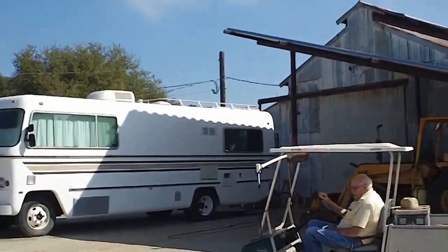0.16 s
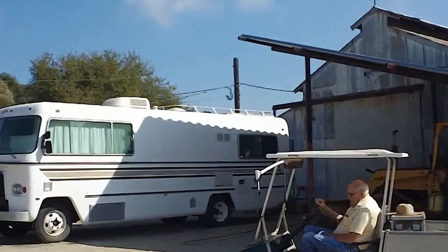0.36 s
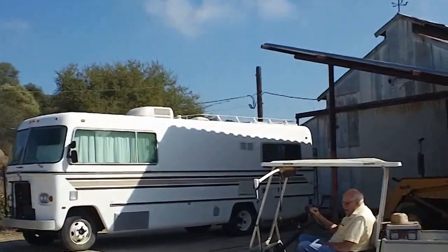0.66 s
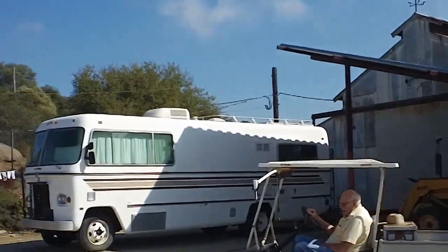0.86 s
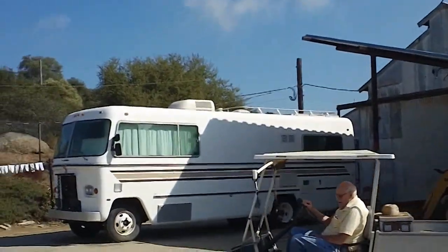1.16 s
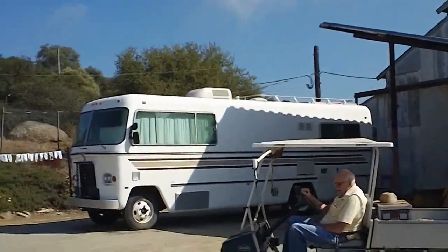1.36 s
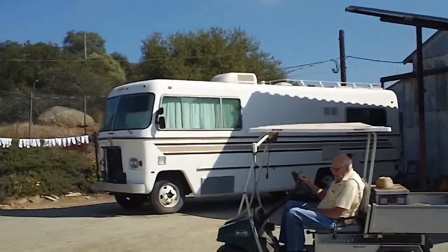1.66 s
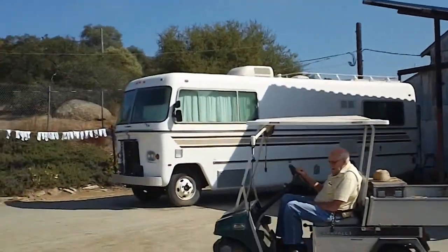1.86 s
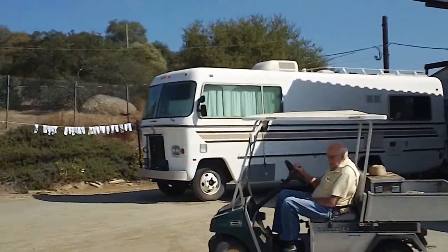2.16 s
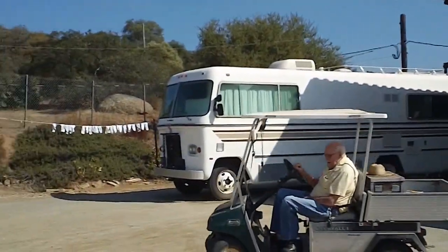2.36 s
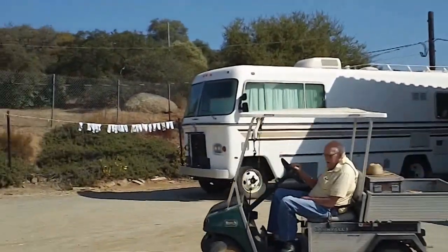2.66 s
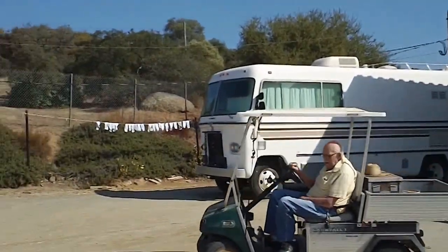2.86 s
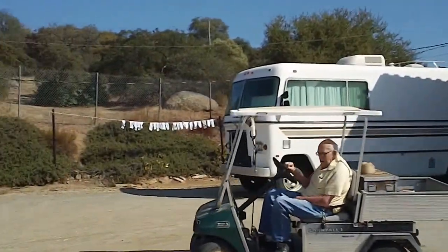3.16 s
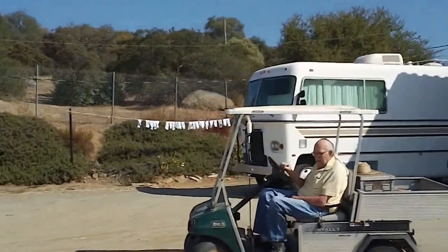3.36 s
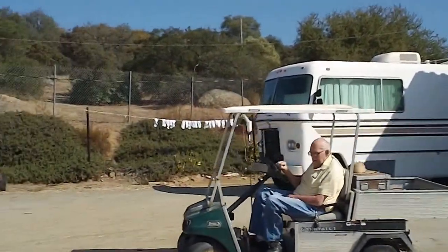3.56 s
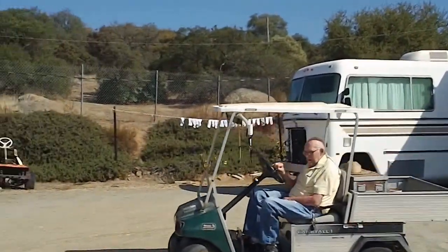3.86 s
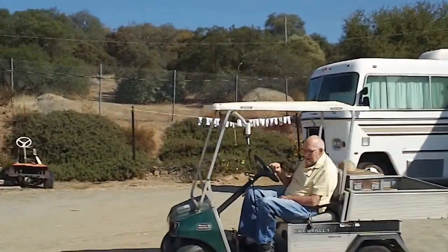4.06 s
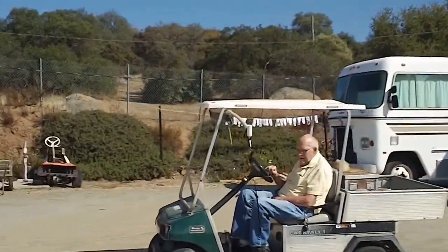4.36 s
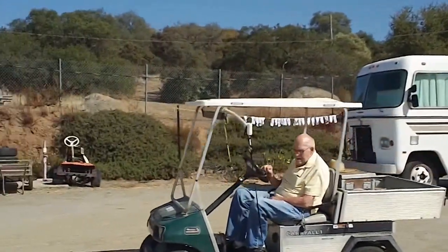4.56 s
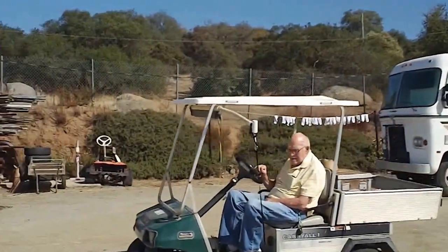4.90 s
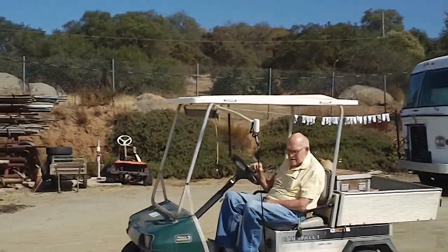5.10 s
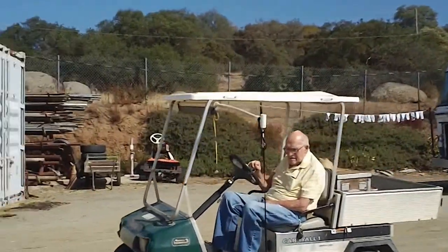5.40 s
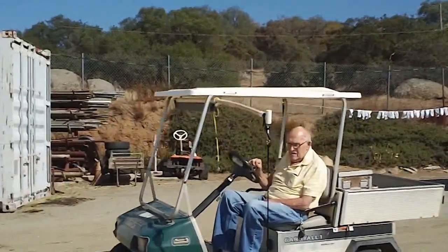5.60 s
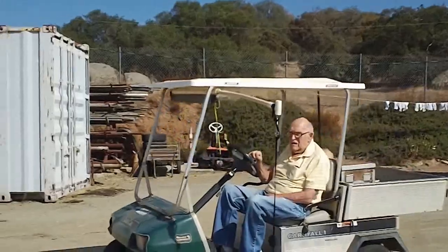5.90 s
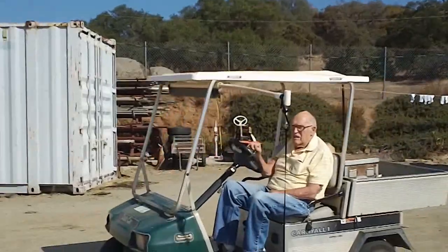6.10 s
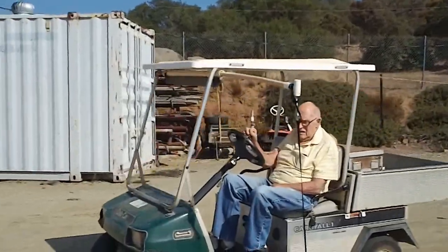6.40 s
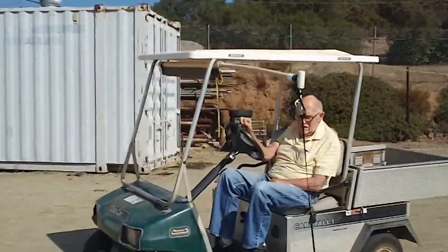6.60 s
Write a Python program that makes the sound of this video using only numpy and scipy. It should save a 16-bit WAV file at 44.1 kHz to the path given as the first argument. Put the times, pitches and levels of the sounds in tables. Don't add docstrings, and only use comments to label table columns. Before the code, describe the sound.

A handheld microphone in open air follows a small cart rolling on loose stones. Two bursts of wind rumble and crackle over it early on, then the rolling comes clear: mid-range drumming, low rumble, fine grit hiss, soft drive pulses and a brief whine. Knocks and stone clicks thicken before another blustery gust breaks in near the end.

```python
import sys
import numpy as np
from scipy import signal
from scipy.io import wavfile
from scipy.ndimage import uniform_filter1d

SR = 44100
rng = np.random.default_rng(int(sys.argv[2]) if len(sys.argv) > 2 else 0)


def dump(signal):
    limited = np.clip(np.atleast_2d(signal).T, -1, 1)
    pcm = np.round(limited * 32767).astype(np.int16)
    wavfile.write(sys.argv[1], SR, pcm)


def field_ratio(decibels):
    return 10 ** (np.asarray(decibels, dtype=float) / 20)


N = 297234


def clock():
    return np.arange(N) / SR


def rms_one(x):
    return x / np.sqrt(np.mean(x ** 2) + 1e-20)


def in_time(rows):
    s, *columns = np.transpose(rows)
    return [np.interp(clock(), s, column) for column in columns]


def drift(rate_hz):
    r = np.exp(-80 * np.pi * rate_hz / SR)
    slow = signal.lfilter([1], [1, -2 * r, r * r], rng.standard_normal(N // 40 + 2002))
    slow = rms_one(slow[2000:])
    return np.interp(np.arange(N) / 40, np.arange(len(slow)), slow)


def noise_band(order, hz, kind):
    return signal.sosfilt(signal.butter(order, hz, kind, fs=SR, output="sos"), rng.standard_normal(N))


def bell(x, hz, width_hz, db):
    w, gain = 2 * np.pi * hz / SR, field_ratio(db)
    pole = np.tan(np.pi * width_hz / SR) / max(gain, 1)
    top = [1 + pole * gain, -2 * np.cos(w), 1 - pole * gain]
    return signal.lfilter(top, [1 + pole, -2 * np.cos(w), 1 - pole], x)


def ring(clicks, hz, t60):
    r, w = field_ratio(-60 / (t60 * SR)), 2 * np.pi * hz / SR
    return signal.lfilter([0, np.sin(w)], [1, -2 * r * np.cos(w), r * r], clicks + 1e-18)


def textured(spectrum, shared_db, own_db, own_rate, grain_db):
    hz, level_db = np.transpose(spectrum)
    edges = np.geomspace(hz[0], hz[-1], int(4 * np.log2(hz[-1] / hz[0])) + 2)
    grain_size = field_ratio(grain_db * np.minimum(rng.exponential(1, (2, N)), 5))
    grains = rng.standard_normal((2, N)) * grain_size
    out = np.zeros(N)
    for k, (low, high) in enumerate(zip(edges, edges[1:])):
        sos = signal.butter(2, [low, high], "band", fs=SR, output="sos")
        band = signal.sosfilt(sos, grains[k % 2])
        centre_db = np.interp(np.log(low * high) / 2, np.log(hz), level_db)
        out += band * field_ratio(centre_db + own_db * drift(own_rate))
    return rms_one(out * field_ratio(shared_db))


# pitch in Hz, level in dB per Hz.
ROAR_SPECTRUM = [(330, -38.5), (560, -9), (635, 6.5), (700, 0), (808, 1), (948, -2.5), (1170, -3.5),
                 (1440, -11.5), (1700, -12.5), (2200, -30.5), (2860, -47), (4840, -120)]


def roar(swing_db, bumps):
    texture = textured(ROAR_SPECTRUM, 1.5 * bumps, own_db=1.4, own_rate=12, grain_db=3.5)
    return field_ratio(-33.5 + 0.87 * swing_db) * texture


# pitch in Hz, level in dB per Hz.
RUMBLE_SPECTRUM = [(24, -60), (40, -43), (91, -8.5), (184, -11), (259, -3), (294, -7.5), (424, -8.5),
                   (520, -14.5), (680, -45.5), (1140, -120)]


def rumble(swing_db, bumps):
    texture = textured(RUMBLE_SPECTRUM, 0.72 * bumps, own_db=1.5, own_rate=17.5, grain_db=2.0)
    return field_ratio(-37.5 + 0.74 * swing_db) * texture


# pitch in Hz, level in dB.
FITTING_PINGS = [(3300, -15), (4040, -1.5), (4860, -4), (5800, -2.5), (6900, -1), (8800, -1.5),
                 (9500, -2.5), (10600, -5)]


def rattles(per_s, t60):
    sizes = field_ratio(2.2 * np.minimum(rng.exponential(1, N), 4)) * (rng.random(N) < per_s / SR)
    dealt = rng.integers(0, len(FITTING_PINGS), N)
    out = np.zeros(N)
    for k, (hz, db) in enumerate(FITTING_PINGS):
        out += field_ratio(db) * ring(sizes * (dealt == k), hz, t60)
    return rms_one(out)


# pitch in Hz, level in dB per Hz.
HISS_SPECTRUM = [(1500, 10), (2300, 2), (2900, 2), (7000, 2), (8000, -11), (9000, -32)]


def hiss(fine_db, bumps):
    texture = textured(HISS_SPECTRUM, 1.6 * bumps, own_db=.7, own_rate=30, grain_db=4.5)
    texture += field_ratio(-11) * rattles(per_s=110, t60=.03)
    return field_ratio(-44 + 0.99 * fine_db) * texture


# pitch in Hz, level in dB per Hz.
GRIT_SPECTRUM = [(7000, -42), (8000, -1), (9000, 3.5), (10200, 1.5), (12000, -6.5), (15200, -8.5),
                 (17000, -31.5)]


def grit(fine_db, bumps):
    return field_ratio(-51 + fine_db) * textured(GRIT_SPECTRUM, 1.6 * bumps, own_db=.8, own_rate=30, grain_db=4.5)


# time in seconds, drive cycles done so far.
DRIVE_CYCLES = [(0, -26.36), (2.5, 5.64), (3.7, 21.82), (5.3, 45.57), (6.74, 67.61)]


def thumps(duck_db):
    cycles, = in_time(DRIVE_CYCLES)
    new_cycle = np.diff(np.floor(cycles + .2), prepend=0) > 0
    pulses = new_cycle * field_ratio(2 * drift(20))
    for hz in (78, 90, 104):
        pulses = ring(pulses, hz, t60=.045)
    return field_ratio(-43.5 + 0.31 * duck_db) * rms_one(pulses)


# time in seconds, peak in dB.
BODY_KNOCKS = [(3.642, -22), (3.939, -18), (3.968, -33), (3.997, -25), (4.039, -29), (4.533, -19),
               (4.716, -12), (4.801, -32), (4.835, -12), (4.855, -21), (5.036, -19), (5.067, -22),
               (5.202, -15), (5.234, -12), (5.333, -13), (5.442, -48), (5.503, -37), (6.72, -33)]
# pitch in Hz, level in dB, time to fade by 60 dB in seconds.
BODY_RINGS = [(690, 0, .035), (840, -1, .03), (1150, -5, .02), (1700, -16, .012)]


def knocks():
    at = [round(s * SR) for s, db in BODY_KNOCKS]
    peak_db = np.array(BODY_KNOCKS)[:, 1]
    luck_db = rng.normal(0, 6.3, (len(at), len(BODY_RINGS)))
    out = np.zeros(N)
    for k, (hz, level_db, t60) in enumerate(BODY_RINGS):
        clicks = np.zeros(N)
        clicks[at] = field_ratio(peak_db + level_db - 10.5 + luck_db[:, k])
        out += ring(clicks, hz, t60)
    rubber = signal.butter(2, 1500, fs=SR, output="sos")
    return signal.sosfilt(rubber, out)


# time in seconds, peak in dB, length in seconds.
SPAT_STONES = [(2.746, -24, 0.0041), (3.209, -27.5, 0.0033), (3.265, -34, 0.0019), (3.546, -34.5, 0.006),
               (4.12, -30, 0.006), (4.28, -17, 0.012), (4.891, -17, 0.0078), (5.14, -18, 0.0073),
               (5.476, -33, 0.0058), (5.535, -18, 0.0065), (5.63, -19, 0.006), (3.282, -22, .003),
               (3.607, -20, .003), (3.9845, -26, .004), (4.3951, -24, .003), (4.5417, -21, .003),
               (4.6555, -24, .003), (5.1918, -24, .003), (5.37, -19, .003), (5.4157, -20, .003),
               (5.4392, -24, .003), (5.8019, -19, .004), (5.8518, -24, .003), (5.903, -25, .003),
               (5.94, -23, .004), (6.07, -20, .004), (6.3945, -22, .005), (6.7188, -22, .004)]


def spits():
    t = clock()
    burst = np.zeros(N)
    for s, db, length in SPAT_STONES:
        after = t > s
        burst += field_ratio(db - 14.5) * np.exp(-(t - s) * after / length) * after
    return burst * noise_band(1, [2800, 11000], "band")


# time in seconds, level in dB.
NEARNESS = [(0, -1.5), (1, -1), (2, 0.7), (2.45, -0.5), (2.65, 0), (3, -2), (3.6, 1.1), (4.1, 2), (4.5, 3),
            (5, 3), (5.5, 3.5), (6.3, 1.5), (6.74, 2.5)]
# time in seconds, swell in dB, length in seconds.
RUT_SWELLS = [(2.757, 2.5, 0.2), (2.947, 2.5, 0.068), (3.18, 4.5, 0.085), (3.587, 2, 0.16),
              (4.063, 2.5, 0.12), (4.755, -2, 0.045), (4.86, 2, 0.063), (5.23, 2, 0.059),
              (5.52, 1.5, 0.059), (5.797, 1, 0.062), (6.09, 1.5, 0.027), (6.74, 1, 0.051)]


def cart(duck_db):
    t = clock()
    ruts_db = sum(db * np.exp(-((t - s) / length) ** 2) for s, db, length in RUT_SWELLS)
    swing_db = duck_db + in_time(NEARNESS)[0] + ruts_db
    fine_db = swing_db - (1 - 0.42) * ruts_db
    cycles, = in_time(DRIVE_CYCLES)
    fine_db = fine_db + .9 * np.cos(4 * np.pi * cycles - .3)
    bumps = 0.21 * drift(4.2) + 0.55 * drift(59)
    rolling = roar(swing_db, bumps) + rumble(swing_db, bumps) + thumps(duck_db)
    stones = hiss(fine_db, bumps) + grit(fine_db, bumps)
    return rolling + stones + knocks() + spits()


# time in seconds, level in dB, length in seconds.
STONE_CRUNCHES = [(3.98, -38, 0.038), (4.075, -39.5, 0.05), (5.237, -45, 0.034), (6.72, -39.5, 0.041),
                  (6.12, -44, .03), (5.98, -48.5, .25), (6.52, -48.5, 0.19)]


def crunches():
    t = clock()
    swell = sum(field_ratio(db) * np.exp(-((t - s) / length) ** 2) for s, db, length in STONE_CRUNCHES)
    return swell * rms_one(noise_band(2, [1400, 2600], "band"))


# time in seconds, pitch in Hz, level in dB.
GEAR_TONE = [
    (2.55, 822, -49),
    (2.972, 823.4, -39.5),
    (3.008, 838.5, -41.5),
    (3.438, 830.9, -39.5),
    (3.516, 870.0, -44),
    (3.55, 869.1, -35),
]


def whine():
    hz, level_db = in_time(GEAR_TONE)
    t = clock()
    fade = np.clip(np.minimum(t - GEAR_TONE[0][0], GEAR_TONE[-1][0] - t) / .1, 0, 1)
    phase = 2 * np.pi * np.cumsum(hz + 10 * drift(14)) / SR
    return fade * field_ratio(level_db - 3 + 4.0 * drift(18)) * np.sin(phase)


# pitch in Hz, width in Hz, lift in dB.
PANEL_RESONANCES = [(262.6, 4.7, 5.5), (350, 10, -1), (664, 14, 2), (692, 23, 4), (827, 15, 4),
                    (1115, 32, 6), (1730, 19, 2.5), (1841, 58, 6), (2270, 120, 4.5), (2720, 160, -2),
                    (389, 14, 2.5), (869, 14, 2.5)]
# pitch in Hz, width in Hz, lift in dB.
HOUSING_RESONANCES = [(3280, 260, 2), (3880, 440, 2.5), (4780, 410, 2.5), (5770, 150, 2), (10500, 630, -4)]
NULL_PITCHES = [540, 4350, 5250, 7830, 7910, 10950]
# width in Hz, depth in dB.
NULL_SHAPES = [(120, -15), (170, -6.5), (250, -2.5), (415, -35), (415, -29), (440, -27)]


def coloured(sound):
    sound = signal.sosfilt(signal.butter(2, 55, "high", fs=SR, output="sos"), sound)
    nulls = [(hz, *shape) for hz, shape in zip(NULL_PITCHES, NULL_SHAPES)]
    for hz, width_hz, db in PANEL_RESONANCES + HOUSING_RESONANCES + nulls:
        sound = bell(sound, hz, width_hz, db)
    return sound


# start in seconds, end in seconds, level in dB.
TURBULENCE = [(0, .55, -36), (0.596, 0.907, -67), (1.1, 1.304, -48), (1.458, 1.762, -37.5),
              (3.34, 3.515, -38), (5.33, 5.71, -45), (5.76, 5.9, -27), (6.14, 6.285, -34),
              (6.378, 6.74, -37.5)]
# pitch in Hz, level in dB per Hz.
WIND_SPECTRUM = [(20, 3), (55, 0.5), (110, 2), (170, 1), (260, -2), (400, -7.5), (600, -33), (1000, -37)]
# pitch in Hz, level in dB per Hz.
FLUTTER_SPECTRUM = [(250, 0.5), (420, 8), (600, 0.5), (900, -23), (1400, -27.5), (2200, -60)]
# time in seconds, peak in dB, centre pitch in Hz,
# flutter in dB.
EDDIES = [(.004, -8, 155, -38), (.03, -22, 150, -57), (.08, -12.5, 185, -46), (.1, -1.5, 224, -27),
          (.121, -8, 129, -47), (.15, -15, 158, -45), (.178, -7.5, 138, -44), (.201, -15, 190, -40),
          (.216, -3, 164, -18), (.251, -1.5, 141, -39), (.271, -9.5, 163, -41),
          (.285, -10.5, 274, -21), (.321, -20, 196, -34), (.352, -9, 219, -27), (.37, -8.5, 213, -28),
          (.4, -5.5, 283, -22), (.431, -13, 172, -46), (.453, -8, 260, -14.5), (.5, -16.5, 120, -36),
          (.553, -3, 364, -28), (.578, -2.5, 170, -18.5), (.622, -10.5, 168, -36),
          (.665, -16.5, 153, -32), (.71, -14.5, 220, -38.5), (.811, -10.5, 109, -34.5),
          (.838, -25, 119, -59),
          (1.105, -28, 139, -59), (1.141, -21, 132, -57), (1.163, -12, 85.5, -49),
                 (1.203, -16, 113, -51), (1.229, -8.5, 138, -33), (1.254, -2.5, 126, -25),
                 (1.269, -3, 216, -27), (1.288, -8, 213, -20.5), (1.332, -8, 120, -17.5),
                 (1.372, -9.5, 98.5, -30.5), (1.414, -20, 159, -46), (1.457, -23, 130, -58),
                 (1.487, -8, 126, -31), (1.537, -16, 124, -33.5), (1.565, -8, 186, -27.5),
                 (1.58, -9.5, 215, -38), (1.599, -22, 183, -36), (1.637, -2.5, 226, -41),
                 (1.649, -7.5, 242, -24), (1.661, -12, 212, -23), (1.675, -13, 254, -21),
                 (1.69, -22, 192, -32), (1.719, -21, 109, -58), (1.743, -28, 173, -43),
                 (3.366, -16.5, 138, -59), (3.451, -24, 190, -45), (3.641, -22, 206, -47),
          (5.632, -6.5, 133, -31), (5.663, -12.5, 184, -47), (5.743, -8, 195, -24),
                (5.769, -7, 136, -48), (5.787, -14, 209, -34), (5.797, -8, 163, -34),
                (5.853, -5.5, 220, -22), (5.872, -10, 240, -28), (5.959, -8, 183, -15.5),
                (5.974, -13, 200, -20), (5.984, -7.5, 176, -21), (6.005, -20, 199, -31),
                (6.11, -15, 168, -47), (6.139, -8.5, 120, -25.5), (6.163, 0.5, 190, -14),
                (6.186, 0.5, 234, -12.5), (6.212, -4, 284, -20), (6.251, -12.5, 138, -45),
                (6.272, -6, 243, -19.5), (6.288, -20, 260, -31), (6.367, -16, 131, -54),
                (6.417, -9.5, 253, -19.5), (6.426, -9, 117, -28.5), (6.491, -13.5, 155, -53),
                (6.508, -14, 108, -53), (6.588, -14, 103, -39),
          (.014, -15, 150, -45), (.024, -20, 130, -52), (.107, -8.5, 190, -36), (.387, -20, 250, -30),
                (.47, -19, 250, -28.5), (1.302, -18, 250, -28), (1.63, -12, 200, -34),
                (5.752, -14, 180, -35), (5.83, -20, 220, -28), (5.883, -14, 230, -26),
                (5.897, -23, 220, -33), (5.996, -9.5, 200, -30), (6.152, -18, 250, -25),
                (6.475, -18, 150, -42), (6.602, -19.5, 150, -47)]


def wind():
    now = clock()
    level, out, flutter = np.zeros(N), np.zeros(N), np.zeros(N)
    for start, end, db in TURBULENCE:
        edge = np.minimum(now - start, end - now) / 0.036 + 1
        level += field_ratio(db) * np.clip(edge, 0, 1) ** 2
    span = np.arange(-2500, 5000)
    t = span / SR
    eddies = EDDIES
    luck = rng.standard_normal((len(eddies), 3))
    for (s, db, hz, flutter_db), (lean, glide, stretch) in zip(eddies, luck):
        at = round(s * SR) + span
        inside = (at >= 0) & (at < N)
        at = at[inside]
        length = 0.44 / hz * np.exp(0.29 * stretch)
        swing = np.cos(2 * np.pi * hz * (t + 6 * glide * t * t) + 2.11 * lean)
        lasting = np.where(t > 0, 1.4 * length, length)
        out[at] += (field_ratio(db) * np.exp(-(t / lasting) ** 2) * swing)[inside]
        flick = np.exp(-(t / 0.002) ** 2) * np.sin(2 * np.pi * 506 * t + lean)
        out[at] += (field_ratio(flutter_db + 2.5) * flick)[inside]
        flutter[at] += (field_ratio(flutter_db) * np.exp(-(t / (0.0038 + length)) ** 2))[inside]
        wake = np.exp(-np.abs(t) / np.where(t > 0, 0.015, 0.0066))
        level[at] += (field_ratio(db - 14.5) * wake)[inside]
    lumps_db = 1.5 * drift(30)
    out += level * textured(WIND_SPECTRUM, lumps_db, own_db=1.5, own_rate=18, grain_db=1.5)
    flutter *= textured(FLUTTER_SPECTRUM, 0, own_db=1.0, own_rate=92, grain_db=-0.5)
    return out + signal.sosfilt(signal.butter(4, 1600, fs=SR, output="sos"), flutter)


# time in seconds, peak in dB.
DIAPHRAGM_SNAPS = [(0.2114, -18.5), (0.2204, -19.5), (0.2882, -29), (0.401, -18.5), (0.4494, -29),
                   (0.5765, -28), (1.2516, -28), (1.266, -26), (1.329, -26.5), (1.3708, -35), (6.1868, -24),
                   (6.269, -31), (6.418, -28.5), (0.5543, -33.5), (0.4519, -19), (0.368, -26.5),
                   (0.4475, -30), (1.2545, -32), (1.3318, -30), (0.251, -41), (0.71, -42), (0.41, -37)]
SNAP_REACH = [7000, 1500, 1500, 1400, 6000, 9000, 6000, 1600, 8000, 1500, 3000, 900, 1300, 1200, 1800, 1300,
              6000, 6000, 7000, 3500, 5000, 900]


def snaps():
    out = np.zeros(N)
    spring = ring(signal.unit_impulse(600), hz=770, t60=0.0053)
    for (s, db), top_hz in zip(DIAPHRAGM_SNAPS, SNAP_REACH):
        edge = signal.sosfilt(signal.butter(3, top_hz, fs=SR, output="sos"), spring)
        out[round(s * SR) + 30:][:len(edge)] += field_ratio(db + 15.0) * edge
    return out


# time in seconds, depth in dB.
GAIN_DIVES = [(0, -3.5), (.05, -6), (.1, -9), (.15, -9.5), (.215, -13), (.26, -18.5), (.45, -20),
              (.58, -23), (1.255, -17), (1.33, -20.5), (1.49, -20), (1.64, -22.5), (5.64, -2.5), (5.96, -2),
              (6.195, -7)]


def gain_db():
    release_db_per_s, attack_s = 16.5, .015
    t = clock()
    dives = [np.where(t >= s, db + release_db_per_s * (t - s), 0) for s, db in GAIN_DIVES]
    held = np.minimum(np.min(dives, axis=0), 0)
    return uniform_filter1d(held, int(attack_s * SR) + 1)


# time in seconds, level in dB, pitch in Hz, length in seconds.
METAL_TICK = (1.068, -47, 5200, .0012)


def peep():
    s, db, hz, length = METAL_TICK
    t = clock() - s
    return field_ratio(db) * np.exp(-(t / length) ** 2) * np.sin(2 * np.pi * hz * t)


# time in seconds, level in dB.
BREEZE_LEVEL = [(0, -39), (.7, -48), (1.1, -49.5), (2.5, -49), (3.2, -51), (4, -59), (5.15, -69),
                (5.45, -38), (6.1, -43), (6.74, -43)]


def still_air(duck_db):
    breeze = rms_one(noise_band(2, [45, 200], "band"))
    breeze *= field_ratio(in_time(BREEZE_LEVEL)[0] + 2 * drift(6.2))
    circuit = bell(noise_band(4, 10000, "high"), NULL_PITCHES[-1], *NULL_SHAPES[-1])
    return breeze + circuit * field_ratio(-58 + 0.49 * duck_db + 1.5 * drift(25))


def scene():
    duck_db = gain_db()
    heard = coloured(cart(duck_db) + crunches() + whine())
    capsule = signal.butter(2, 48, "high", fs=SR, output="sos")
    at_diaphragm = signal.sosfilt(capsule, heard + wind())
    return (at_diaphragm + snaps() + still_air(duck_db) + peep())[None]


def top_cut(x):
    return signal.sosfilt(signal.butter(12, 15330, fs=SR, output="sos"), x)


def record(dry):
    rounded = dry / (1 + np.abs(dry / .96) ** 8) ** (1 / 8)
    top = signal.ellip(12, .3, 45, 15350, fs=SR, output="sos")
    return top_cut(signal.sosfilt(top, rounded))


dry = scene()
out = record(dry)
dump(out)
```